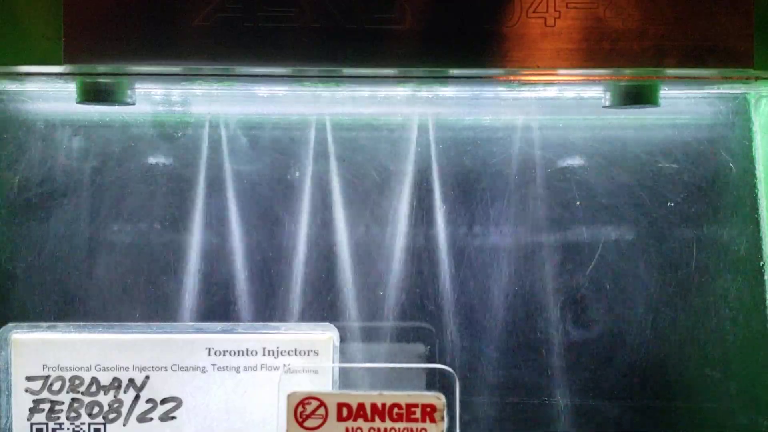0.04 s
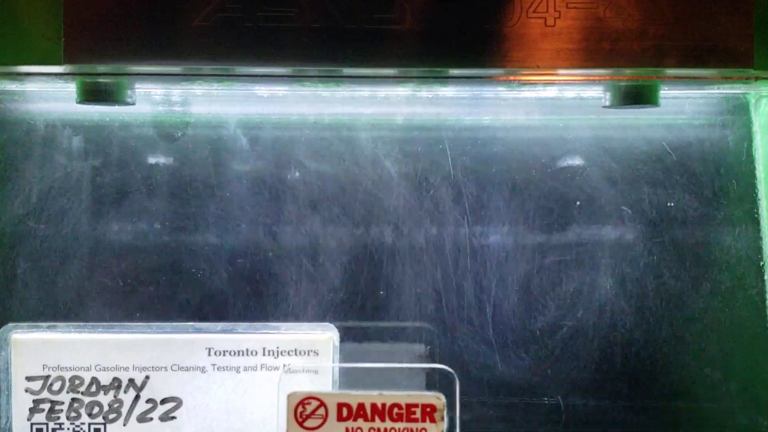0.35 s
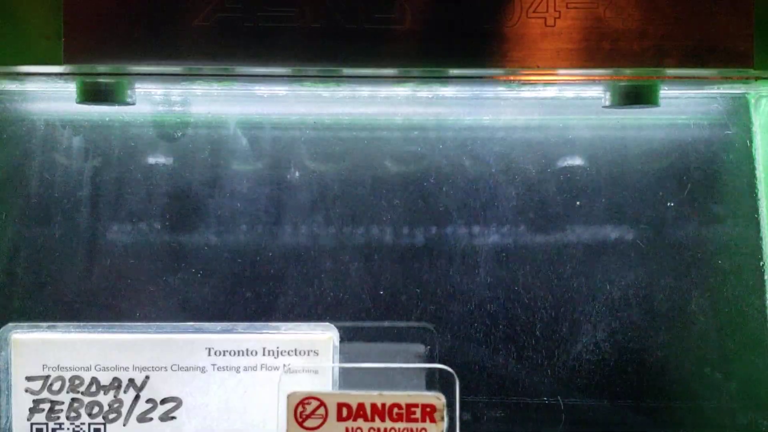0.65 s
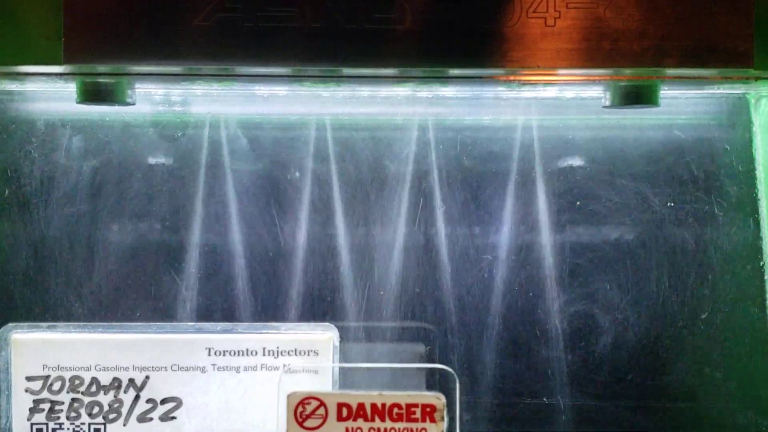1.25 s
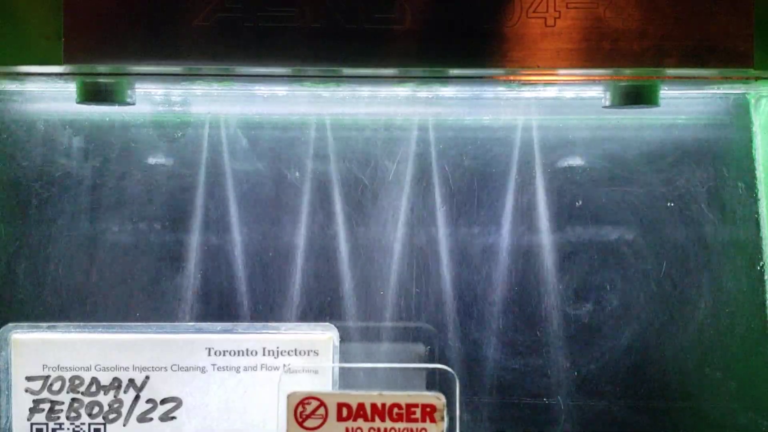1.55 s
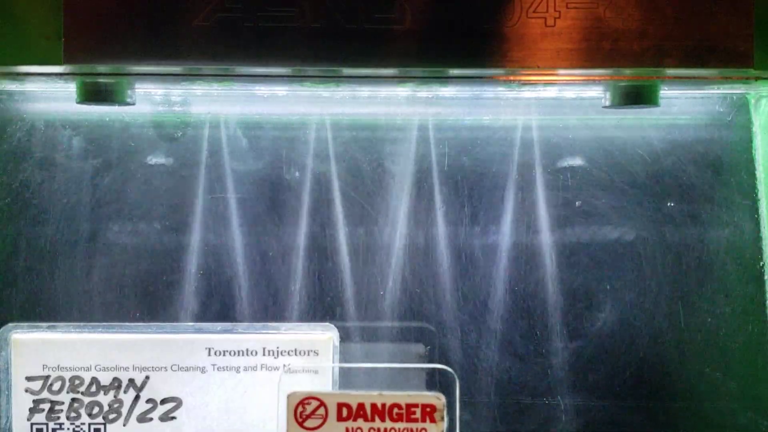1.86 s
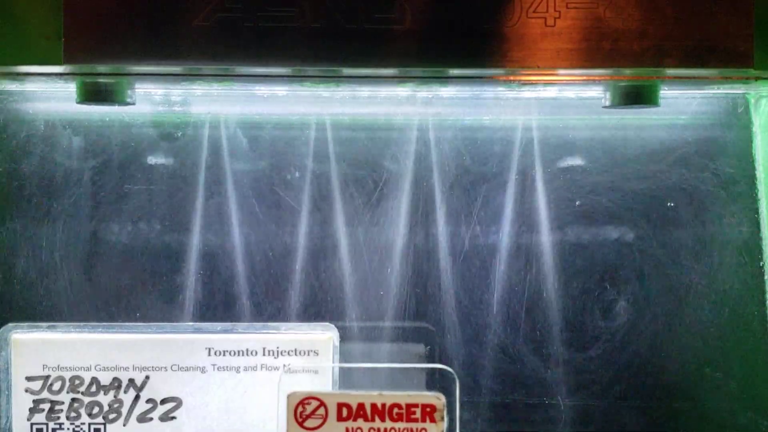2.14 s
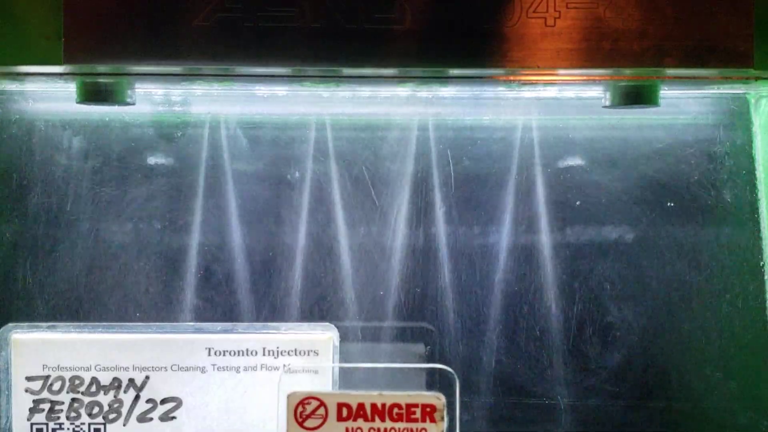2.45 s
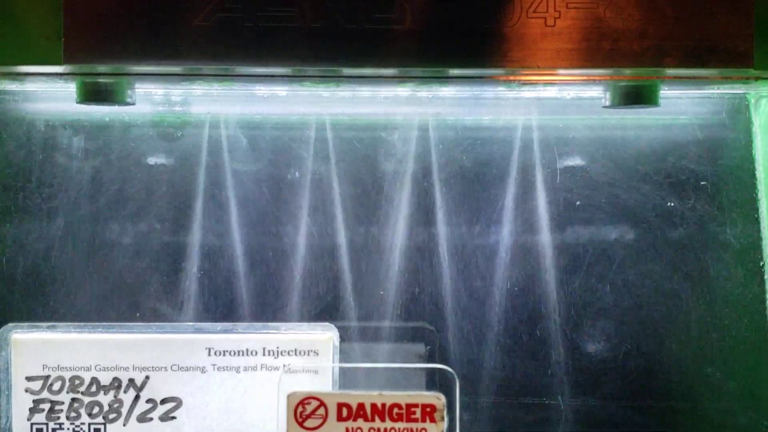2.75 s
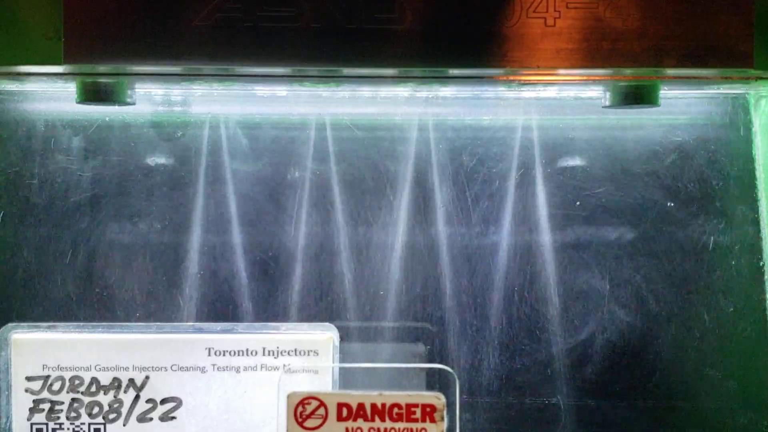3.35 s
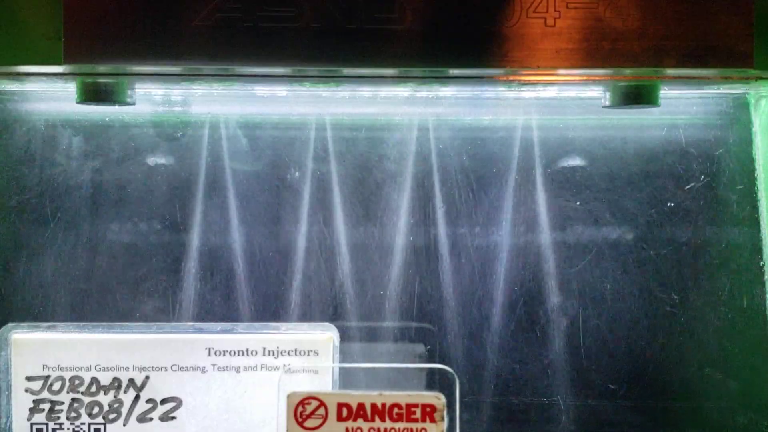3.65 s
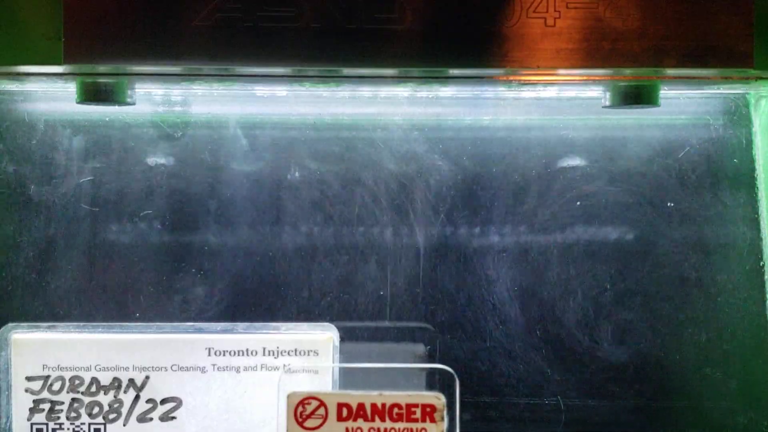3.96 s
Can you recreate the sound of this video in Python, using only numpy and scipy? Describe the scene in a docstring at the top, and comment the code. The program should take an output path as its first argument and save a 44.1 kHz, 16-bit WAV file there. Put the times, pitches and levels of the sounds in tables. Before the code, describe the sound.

Close to a test bench, fuel injectors fire in a bright, hissing, metallic buzz. A short burst gives way to a pause with only low pump hum and faint hiss, then a longer, faster run follows and stops.

```python
"""Four fuel injectors click in turn on a test bench: a slow run, a pause, then a faster run.
Each needle strikes on opening and on closing; the impacts excite free vibration of its steel body
and the fuel rail, the openings also drive the panel modes, and each nozzle sprays while open.
A vane pump hums at harmonics of its shaft rate, the bench rumbles and the pressure regulator hisses.
The fuel line shudders and knocks when the flow starts or stops."""
import sys
import numpy as np
from scipy import signal
from scipy.fft import rfft, irfft, next_fast_len
from scipy.io import wavfile
from scipy.ndimage import uniform_filter1d

SR = 44100
rng = np.random.default_rng(int(sys.argv[2]) if len(sys.argv) > 2 else 0)


def output_pcm(signal):
    """Save a mono or channel-first signal as 16-bit PCM at the path in sys.argv[1].

    Samples are clipped to [-1, 1] before scaling.
    """
    pcm = np.clip(np.atleast_2d(signal).T, -1, 1) * 32767
    wavfile.write(sys.argv[1], SR, np.round(pcm).astype(np.int16))


N = 176400
T = np.arange(N) / SR


def undb(db):
    """Amplitude ratio of a level in decibels."""
    return 10 ** (np.asarray(db) / 20)


def level(x, db):
    """Normalisation to an rms level."""
    return x * undb(db) / np.sqrt(np.mean(x ** 2) + 1e-20)


def pan(db):
    """Left and right gains for a level difference L-R."""
    return undb(np.array([[.5], [-.5]]) * db)


def colour(x, spectrum, balance=((1000, 0),)):
    """Spectral shaping by level and L-R curves, interpolated in log frequency."""
    size = next_fast_len(N + SR // 10, True)
    log_f = np.log(np.fft.rfftfreq(size, 1 / SR) + 1)
    curve = lambda rows: np.interp(log_f, np.log([r[0] for r in rows]), [r[1] for r in rows])
    return irfft(rfft(x, size) * undb(curve(spectrum)) * pan(curve(balance)))[:, :N]


def wander(size, count):
    """Smooth random fluctuation of spread near 1, correlated over count steps."""
    steps = np.repeat(rng.standard_normal(size // count + 2), count)
    return 1.2 * uniform_filter1d(steps, count)[count // 2:count // 2 + size]


def pulses(times, sizes, taps=16):
    """Band-limited impulses, placed between samples by a windowed sinc."""
    at = times[:, None] * SR
    index = np.floor(at).astype(int) + np.arange(1 - taps // 2, 1 + taps // 2)
    weight = sizes[:, None] * np.sinc(index - at) * np.sinc((index - at) / (taps / 2))
    inside = (index >= 0) & (index < N)
    return np.bincount(index[inside], weight[inside], N)


def ring(x, response):
    """Convolution with a stereo impulse response."""
    return signal.oaconvolve(x[None], response, axes=1)[:, :N]


def phases(hz, diffuse_hz=790):
    """Diffuse field: left and right phases differ by up to half a cycle, less below diffuse_hz."""
    return np.pi * min(hz / diffuse_hz, 1) ** 2 * rng.uniform(-.5, .5, (2, 1))


def openings(k, run):
    """Periodic firing: opening times of injector k, staggered evenly within the cycle."""
    start, end, rate_hz = run[:3]
    return np.arange(start + k / rate_hz / len(INJECTOR_LEVELS), end, 1 / rate_hz)


# test runs: start t/s, end t/s, firing f/Hz, open time/ms, relative strike level/dB
TEST_RUNS = [(-.0784, .383, 43.55, 8.3, 2.6), (0.7727, 3.903, 57.4565, 2.7, 3)]
def strikes(k, closing, scatter_db=.4, jitter_s=2.5e-6):
    """Impulse train of needle k hitting its stop or seat, periodic but for slight jitter and drift."""
    out = 0
    for run in TEST_RUNS:
        open_ms, db = run[3:]
        times = openings(k, run) + closing * open_ms / 1000
        late, force = rng.standard_normal((N // 100, 2))[:len(times)].T
        drift_s = 8e-6 * wander(N // 100, count=40)[:len(times)]
        out = out + pulses(times + jitter_s * late + drift_s, undb(db + scatter_db * force))
    return out


# injectors in firing order: relative opening level/dB, relative closing level/dB, L-R/dB
INJECTOR_LEVELS = [(1.5, -1.5, 1.5), (-2, -3.7, 2), (-3.5, -2.5, -7), (2.5, 0.1, -5)]
# spectrum of click and spray: f/Hz, relative level/dB
CLICK_SPECTRUM = [(150, -37), (400, -16), (800, -13), (1400, -36), (2200, -15), (3000, -6), (3700, -4),
                  (4600, -13), (6000, -5.5), (7200, -8), (7700, 1), (8500, 4.5), (9600, 11), (11000, 6.5),
                  (12400, 9.5), (13500, 6.5), (14700, 12.5), (15400, 6.5)]
# their balance: f/Hz, L-R/dB
CLICK_BALANCE = [(300, 22), (1200, -22), (2600, -5), (3800, 11), (5500, -4.5), (7000, -7), (7700, -18.5),
                 (9000, -7.5), (10200, 0), (12500, 1), (15300, -4.5)]
def needles():
    """Impact excitation: a crack, a short steel ring and the cabinet's echo, with one rebound."""
    rise_s, bounce_delay_s = .00015, .0006
    crack_s, steel_s, cabinet_s = .0006, .002, .019  # decay time constants
    t, out = T[:SR // 6], 0
    decay = np.exp(-t / crack_s) + undb(-17) * np.exp(-t / steel_s) + undb(-19) * np.exp(-t / cabinet_s)
    impact = decay * (1 - np.exp(-t / rise_s))
    rebound = undb(-4) * np.interp(t - bounce_delay_s, t, impact)
    envelope = np.hypot(impact, rebound)  # incoherent sounds add in power
    for k, (*strike_db, side_db) in enumerate(INJECTOR_LEVELS):
        for closing in (0, 1):
            clicks = ring(strikes(k, closing), envelope * rng.standard_normal((2, len(t))))
            out = out + undb(strike_db[closing]) * pan(side_db) * clicks
    return level(colour(out, CLICK_SPECTRUM, CLICK_BALANCE), -28)


# ring of the fuel rail: f/Hz, relative level/dB
RAIL_SPECTRUM = [(700, -18), (1400, -16.5), (2200, -12), (3000, -4), (3700, 0.5), (4600, -5.5),
                 (5500, -2.5), (6700, 1), (8000, -4), (11000, -10)]
# its balance: f/Hz, L-R/dB
RAIL_BALANCE = [(1400, 13), (2500, -17), (3700, 1), (5300, -3), (6200, -3)]
def rail(decay_s=.0097):
    """Damped vibration: the injectors rattle unevenly in the rail, which rings on between strikes."""
    t, out = T[:SR // 16], 0
    for k in range(len(INJECTOR_LEVELS)):
        for closing in (0, 1):
            rattle = strikes(k, closing, scatter_db=1, jitter_s=1.2e-5)
            out = out + ring(rattle, np.exp(-t / decay_s) * rng.standard_normal((2, len(t))))
    return level(colour(out, RAIL_SPECTRUM, RAIL_BALANCE), -41)


# modes of panels and fittings: f/Hz, T60/s, rms level/dB, half-waves along the rail, L-R/dB
PANEL_MODES = [(114.5, 0.17, -53.5, 3, 0), (173, 0.26, -63.5, 1, 2), (229.2, 0.17, -43, 0.5, -.5),
               (282.3, 0.11, -57.5, 2, -1.5), (346.4, 0.25, -60.5, 3, -11.5), (519.5, .2, -58.5, .3, -3),
               (696.8, .22, -52.5, 0, 3.5), (1098, .12, -50.5, 2, -7), (1440, .12, -52, 2, -7.5),
               (979.5, 0.11, -62.5, 3.5, 13.5), (1144, 0.14, -57.5, 0, -4.5), (1230, 0.11, -68, 1.5, -13),
               (1329.4, 0.13, -57.5, 0.34, 14.5), (1538.4, 0.25, -59, 2.5, -10.5),
               (1868, .12, -55, 0.5, 2.5), (1940, 0.12, -78, 1.5, 2), (2022, 0.071, -60.5, 1.5, -14.5),
               (2307, 0.09, -64.5, 1, 4), (3260, 0.02, -72.5, 1.5, -18), (3800, 0.044, -59, 1, 3),
               (3762, 0.027, -52.5, 3, 7.5), (4135, 0.098, -68.5, 1, -6), (4255, 0.13, -56, 2, -5),
               (4890, 0.12, -61.5, 1, 9)]
def panels():
    """Modal superposition: each opening drives a mode in proportion to its shape at that injector."""
    kicks, out = np.array([strikes(k, 0) for k in range(len(INJECTOR_LEVELS))]), 0
    place = (np.arange(len(kicks)) + .5) / len(kicks)  # fraction of the rail's length
    for hz, t60, db, half_waves, side_db in PANEL_MODES:
        pole = np.exp((2j * np.pi * hz - np.log(1000) / t60) / SR)
        drive = np.cos(np.pi * half_waves * place) @ kicks
        mode = signal.lfilter([1], [1, -pole], drive)
        out = out + pan(side_db) * level((mode * np.exp(1j * phases(hz))).real, db)
    return out


def spray():
    """Jet noise: each nozzle hisses for as long as it is open."""
    open_nozzles = np.zeros(N)
    for run in TEST_RUNS:
        open_s = run[3] / 1000
        for k in range(len(INJECTOR_LEVELS)):
            times = openings(k, run)
            since = T - times[np.maximum(np.searchsorted(times, T) - 1, 0)]
            open_nozzles += (since > 0) & (since < open_s)
    hiss = colour(rng.standard_normal((2, N)), CLICK_SPECTRUM, CLICK_BALANCE)
    return level(hiss, -37) * open_nozzles


# pump tones, nine vanes passing per turn: multiple of the shaft rate, rms level/dB
PUMP_HARMONICS = [(1, -39.5), (2, -58), (3, -59.5), (4, -61.5), (9, -53), (10, -62), (15, -64.5), (16, -60),
                  (18, -56), (27, -63.5), (36, -62), (45, -68.5), (54, -70)]
def pump():
    """Rotational harmonics, rising a little while the injectors let fuel out, and a faint motor whine."""
    idle_hz, relief_hz, lag_s, whine_hz = 51.39, .58, .04, 395.6
    wobble, flutter_db = .00047, .38

    def tone(cycles, hz, db):
        """Sinusoid of a given rms level and random phase."""
        return undb(db) * np.sqrt(2) * np.sin(2 * np.pi * (cycles + rng.random()) + phases(hz))

    drawing = sum(1. * ((T > start) & (T < end)) for start, end, *_ in TEST_RUNS)
    pole = np.exp(-1 / (lag_s * SR))
    relief = signal.lfilter([1 - pole], [1, -pole], drawing, zi=drawing[:1])[0]  # first-order lag
    shaft_hz = (idle_hz + relief_hz * relief) * (1 + wobble * wander(N, count=5000))
    turns = np.cumsum(shaft_hz) / SR
    hum = sum(tone(k * turns, k * idle_hz, db) for k, db in PUMP_HARMONICS)
    whine = tone(whine_hz * T, whine_hz, -58)
    return (hum + whine) * undb(flutter_db * wander(N, count=2000))


# rumble of the bench: f/Hz, relative level/dB
RUMBLE_SPECTRUM = [(25, -18), (60, -0.5), (100, -4), (170, -1), (280, -11.5), (420, -12), (600, -15),
                   (900, -12.5), (1200, -23), (2500, -27.5), (5000, -45)]
def bench_rumble():
    """Random vibration of the running bench, partly coherent between left and right."""
    mid, side = rng.standard_normal((2, N))
    noise = mid + undb(-5) * np.array([side, -side])
    return level(colour(noise, RUMBLE_SPECTRUM) * pan(-7.5), -46)


# hiss of the regulator: f/Hz, relative level/dB
HISS_SPECTRUM = [(500, -4), (3000, 2), (5500, 2), (7800, -8.5), (9500, 4.5), (11500, 8.5), (12400, 11.5),
                 (13300, 1), (15500, 6)]
# its balance: f/Hz, L-R/dB
HISS_BALANCE = [(3000, 1), (6000, 0), (7800, -15), (9500, 4), (11500, 0), (12500, 11), (13500, 6),
                (15500, -9)]
def regulator_hiss():
    """Broadband flow noise of fuel passing through the pressure regulator."""
    return level(colour(rng.standard_normal((2, N)), HISS_SPECTRUM, HISS_BALANCE), -49.5)


# fuel line surges: onset t/s, greatest rms shudder level/dB, peak knock level/dB
LINE_SURGES = [(0.386, -38.5, -51), (0.774, -44, -38.5), (3.903, -47, -39.5)]
# shudder of the line: f/Hz, relative level/dB
SHUDDER_SPECTRUM = [(40, -12), (90, -0.5), (180, -7), (300, -25), (1500, -46)]
def surges(rise_s=.021, knock_hz=267):
    """Pressure transients: the fuel line shudders and knocks when the flow starts or stops."""
    out, shudder = 0, level(colour(rng.standard_normal(N), SHUDDER_SPECTRUM), 0)
    for start, shudder_db, knock_db in LINE_SURGES:
        age = np.maximum(T - start, 0) / rise_s
        knock = np.sin(2 * np.pi * knock_hz * (T - start))
        out = out + age * np.exp(1 - age) * (undb(shudder_db) * shudder + undb(knock_db) * knock)
    return out


def scene():
    """Linear superposition of the bench's sources, heard from close by."""
    injection = needles() + rail() + panels() + spray()
    return injection + pump() + bench_rumble() + regulator_hiss() + surges()


def record(dry):
    """Band limiting: a steep elliptic low-pass at 15850 Hz."""
    return signal.sosfilt(signal.ellip(12, .2, 80, 15850, fs=SR, output="sos"), dry)


dry = scene()
out = record(dry)
output_pcm(out)
```